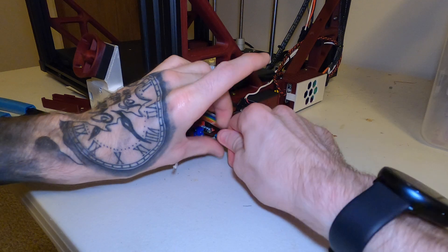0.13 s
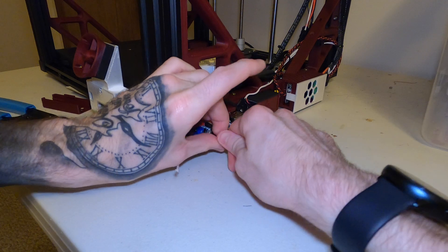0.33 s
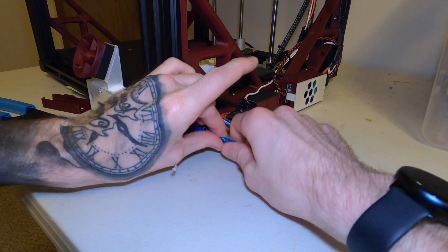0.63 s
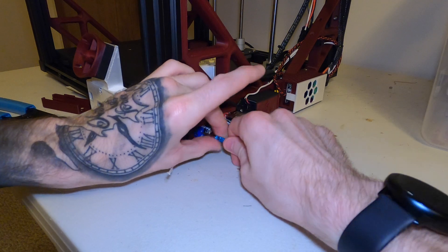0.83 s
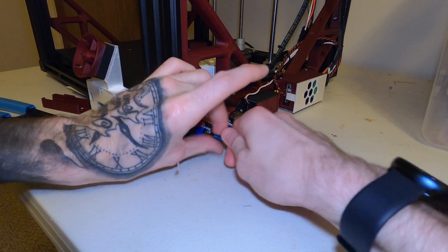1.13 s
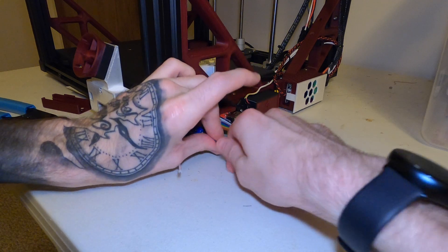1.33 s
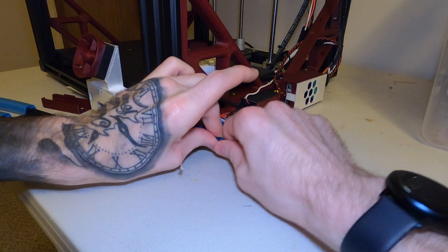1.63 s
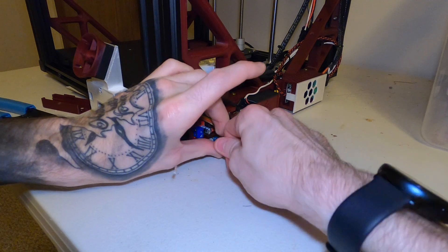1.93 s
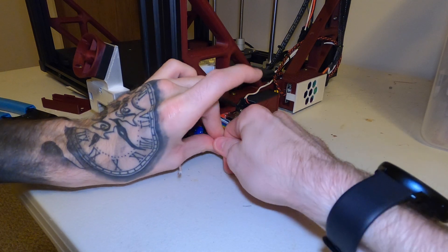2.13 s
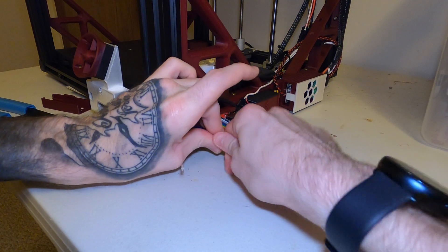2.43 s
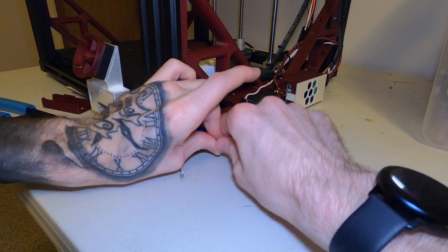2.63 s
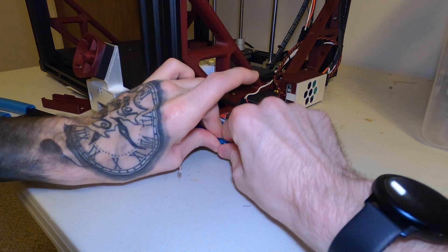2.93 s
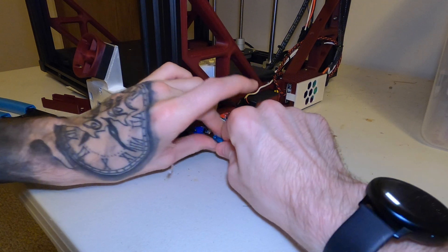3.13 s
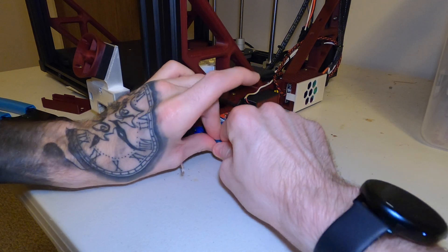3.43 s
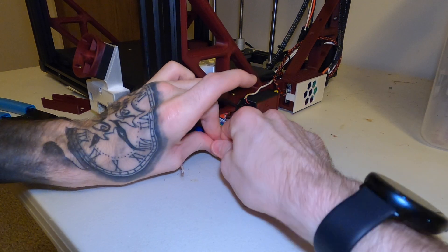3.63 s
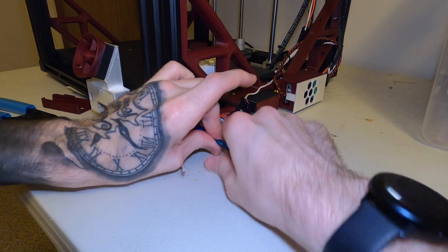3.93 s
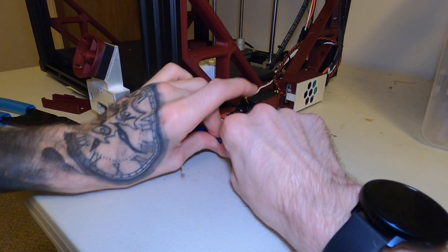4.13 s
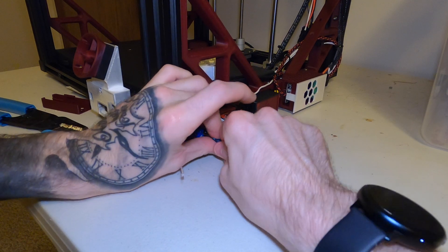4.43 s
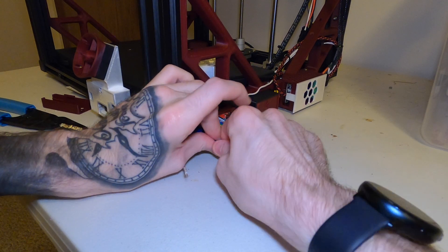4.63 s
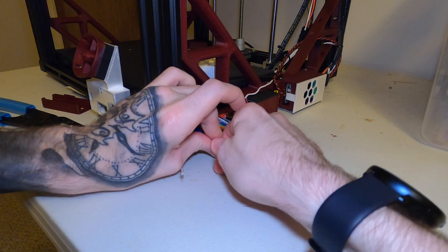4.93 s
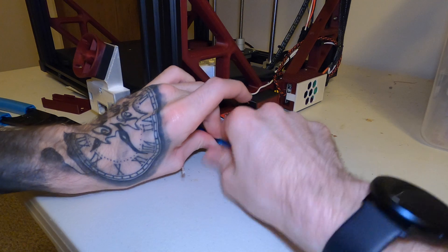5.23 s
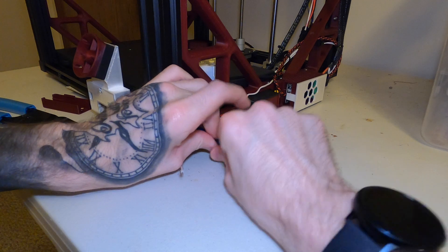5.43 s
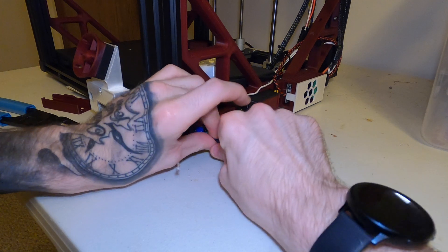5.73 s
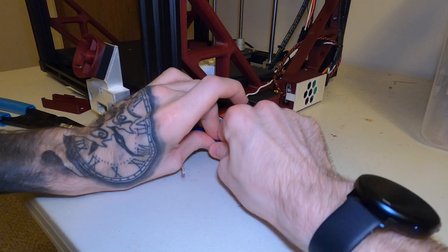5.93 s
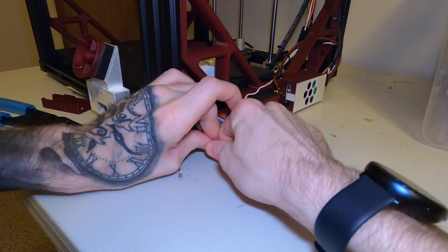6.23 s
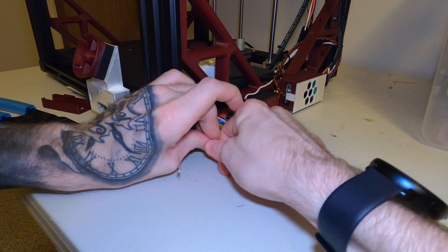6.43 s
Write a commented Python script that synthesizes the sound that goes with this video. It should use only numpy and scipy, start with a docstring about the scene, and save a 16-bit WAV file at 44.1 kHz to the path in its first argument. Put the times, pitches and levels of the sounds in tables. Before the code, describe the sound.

Plastic catches tick and twice snap loudly amid soft hand rubbing, thin wire scrapes and dull thuds against a frame on a bench.

```python
"""Wiring a small plastic module

Fingers work thin wires into a plastic module held against a machine frame on a bench.
Hands rub and bump the frame, which shudders dully. Wires scrape in tiny jerks and ping off
fingertips. Plastic catches tick as they let go and twice snap loudly, ringing the shell.
The bench rumbles under the wrists, and a small hard room echoes over a faint steady hiss."""
import sys
import numpy as np
from scipy import signal
from scipy.fft import rfft, irfft, next_fast_len
from scipy.io import wavfile

SR = 44100
rng = np.random.default_rng(int(sys.argv[2]) if len(sys.argv) > 2 else 0)


def put_to_file(sound):
    """Save the sound as 16-bit audio at rate SR, in the file named by the first command-line argument."""
    columns = np.atleast_2d(sound).T  # one column per channel
    safe = np.clip(columns, -1, 1)
    whole_steps = np.round(safe * 32767)
    wavfile.write(sys.argv[1], SR, whole_steps.astype(np.int16))


N = 289957

# Levels in the tables are relative: each source adds its own gain.
# plastic catches letting go: start_s, shell_db, crack_db, clack_db
CATCH_SNAPS = [(0.4997, -24.5, -44.5, -34), (0.5248, -13, -18.5, -21), (0.5534, -27.5, -37, -29),
               (0.853, -52, -75.5, -36.5), (1.172, -50.5, -61, -63), (1.943, -41, -46, -67),
               (2.8664, -11, -8, -38.5), (3.167, -46.5, -71, -58.5), (3.2227, -43.5, -56.5, -53),
               (3.797, -54.5, -67.5, -43), (4.286, -43, -54, -60), (5.281, -37.5, -46, -57),
               (5.292, -51, -63.5, -46), (5.507, -45.5, -54.5, -46), (5.637, -44.5, -48.5, -54.5)]
# fingers and module bumping the frame: start_s, clack_db, thud_db, tick_db
FRAME_BUMPS = [(0.1053, -29, -50.5, -45), (0.125, -17, -36.5, -30), (0.1442, -15, -29, -31.5),
               (0.374, -82, -43, -89), (0.5247, -32, -54, -12), (0.948, -33, -27, -43),
               (0.974, -24, -30.5, -37), (1.103, -42, -32, -54.5), (1.285, -32, -23, -33.5),
               (1.388, -64, -33.5, -80), (1.407, -44.5, -43, -50), (1.965, -44, -25, -65),
               (2.284, -38, -32.5, -45), (2.486, -62, -40, -59), (2.521, -47, -32, -53),
               (3.056, -71, -43.5, -79), (3.473, -63.5, -39.5, -68.5), (3.633, -49, -33, -57),
               (3.698, -61, -32, -56.5), (3.949, -38, -32, -50), (4, -35.5, -34.5, -41),
               (4.464, -71, -42, -71), (4.744, -40.5, -27, -58), (4.798, -49, -34, -56),
               (5.051, -72, -50.5, -75.5), (5.138, -40, -30, -63), (5.315, -58.5, -38.5, -70),
               (5.507, -46.5, -29, -52), (5.764, -59, -41.5, -72), (5.819, -57, -36, -75),
               (6.089, -47, -29, -57)]
# tone of a hollow clack: pitch_hz, level_db
CLACK_TONE = [(40, -53), (150, -15.5), (400, -4), (800, -1.5), (1150, 2), (1400, -3.5), (1900, 1.5),
              (2600, -12.5), (4000, -26.5), (6000, -41.5), (12000, -70)]


def snaps(low_hz=220):
    """A catch lets go with a crack that rings the shell; hard snaps also set steel rods ringing."""
    # tone of the sharp crack: pitch_hz, level_db
    crack_tone = [(40, -56.5), (200, -29), (550, -18), (900, -26.5), (1300, -18), (1700, 0.5), (3200, 4),
                  (3650, -2.5), (5200, 1), (6200, -12), (7800, -17), (10000, -29.5), (13000, -41.5),
                  (15000, -58)]
    # notes of the plastic shell: pitch_hz, width_hz, level_db
    shell_notes = [(1310, 200, -16.5), (1502, 71, -3.5), (1814, 83, 1), (2170, 200, -4), (2355, 100, 1.5),
                   (2860, 160, -5.5), (3080, 250, -14), (3880, 120, -13), (4626, 380, -18), (5170, 82, -14)]
    # notes of the thin steel rods: pitch_hz, width_hz, level_db
    rod_notes = [(983, 2.4, -10.5), (1665, 18, 4), (1586, 22, -2), (2470, 10, -4.5), (3230, 9, -3.5),
                 (4900, 5, -7.5)]
    out = np.zeros(N)
    crack, clack = as_hit(click(crack_tone)), as_hit(click(CLACK_TONE))
    rods = as_hit(ring(rod_notes, scatter_db=5.5, size=18000))
    for start_s, shell_db, crack_db, clack_db in CATCH_SNAPS:
        shell = amp(shell_db - 4.5) * as_hit(ring(shell_notes, scatter_db=1.7, size=2000))
        add(out, start_s, shell)
        scatter = amp(1.5) * rattle(fade_s=0.039)  # bench and hands scatter the sound
        add(out, start_s, room(shell, wet_db=3, direct=scatter))
        add(out, start_s, amp(2 * shell_db - 12.5) * rods)
        contact = amp(crack_db - 5) * dulled(crack, crack_db) + amp(clack_db - 11) * clack
        add(out, start_s, room(contact, wet_db=3.5, direct=rattle(fade_s=0.012)))
    return cut_bass(out, low_hz)  # so small a part gives off no bass


def dulled(crack, crack_db, top_hz=20000, db_per_octave=23.5):
    """A gentle release is slower, so its crack loses treble."""
    edge_hz = np.clip(top_hz * 2 ** (crack_db / db_per_octave), 1000, SR / 2.2)
    return signal.sosfilt(signal.butter(2, edge_hz, fs=SR, output="sos"), crack)


def bumps(damping_s=0.16):
    """Each bump thuds in the frame; harder contacts also clack and tick."""
    # tone of a bright tick: pitch_hz, level_db
    tick_tone = [(500, -40), (1800, -20.5), (2600, -13.5), (3400, 0.5), (3800, 4), (4150, 5.5),
                 (4700, -3.5), (5300, -8.5), (6300, -15), (8500, -28.5), (11000, -39.5), (14500, -53.5)]
    out = np.zeros(N)
    clack, tick = as_hit(click(CLACK_TONE)), as_hit(click(tick_tone))
    for start_s, clack_db, thud_db, tick_db in FRAME_BUMPS:
        thud = frame_ring(scatter_db=5, low_hz=160)
        thud *= fade(len(thud), damping_s)  # the hand damps the frame
        add(out, start_s, amp(thud_db - 5) * as_hit(thud))
        contact = amp(clack_db - 4.5) * clack + amp(tick_db - 2) * tick
        add(out, start_s, amp(-15) * contact)  # the first touch, then its rattle
        add(out, start_s, room(contact, wet_db=-7, direct=amp(-3) * rattle(fade_s=0.037)))
    return out


def frame_ring(scatter_db, low_hz):
    """The frame struck once; it gives off little deep bass."""
    # notes of the frame on the bench: pitch_hz, width_hz, level_db
    frame_notes = [(67, 12, -25), (133, 25, -14), (188.3, 19, 3), (216, 30, -3.5), (226, 28, 1.5),
                   (287.7, 24, 1), (360.2, 42, -4), (421.8, 69, -9.5), (585, 38, -16), (780, 53, -20.5)]
    return cut_bass(ring(frame_notes, scatter_db), low_hz)


def rubbing():
    """Skin drags on the frame and the module while the wires scrape past each other."""
    # tone of rubbing skin: pitch_hz, level_db
    rub_tone = [(40, -51), (150, -19), (400, 5.5), (650, 2), (800, 0), (1050, -7), (1600, -4), (2300, -16),
                (3000, -20.5), (6000, -44.5), (12000, -66.5)]
    # tone of scraping wires: pitch_hz, level_db
    scrape_tone = [(500, -37.5), (1800, -7), (2600, -4.5), (3150, 3), (3600, 7.5), (4100, -6), (5200, -3),
                   (6500, -17.5), (8500, -28), (11000, -33), (14500, -50)]
    # rasp of the ribbed wire: pitch_hz, width_hz, level_db
    rasp_notes = [(2980, 660, -5.5), (3490, 88, -3.5)]
    shudder, rub, scrape = stroke_strengths()
    frame = friction(slips(per_s=1100, spread_db=1), frame_ring(scatter_db=-2, low_hz=74.1))
    skin = friction(slips(per_s=1200, spread_db=0.5), click(rub_tone))
    grit = friction(slips(per_s=1900, spread_db=1), click(scrape_tone))
    rasp = friction(slips(per_s=900, spread_db=1.5), ring(rasp_notes, scatter_db=-0.5))
    bite = np.sqrt(scrape * shudder)  # the wire rasps only when it slides under pressure
    sliding = rub * skin + amp(-0.5) * scrape * grit + amp(-13.5) * bite * rasp
    return amp(-0.5) * shudder * frame + room(sliding, wet_db=-9.5)[:N]


def stroke_strengths():
    """How strongly the frame shudders, the skin rubs and the wires scrape over time."""
    # pushes and slides of the fingers: peak_s, rise_s, fall_s, shudder_db, rub_db, scrape_db
    strokes = [(0.079, 0.039, 0.036, -61, -53, -62), (0.116, 0.0071, 0.11, -58.5, -38.5, -43.5),
               (0.21, 0.059, 0.058, -43.5, -37.5, -58), (0.41, .05, .15, -52, -68.5, -73.5),
               (0.482, .04, .065, -44, -42, -44.5), (0.66, 0.37, 0.82, -58.5, -81, -89),
               (0.87, 0.094, 0.26, -45.5, -59.5, -72), (0.965, 0.063, 0.095, -37, -38.5, -54.5),
               (1.201, 0.35, 0.36, -55.5, -66, -69), (1.294, 0.015, 0.086, -33, -45.5, -51),
               (1.416, 0.034, 0.074, -43.5, -42, -48.5), (1.80, 0.059, 0.053, -44.5, -59, -64),
               (1.899, 0.11, 0.13, -39.5, -59.5, -68), (1.99, 0.11, 0.1, -35.5, -53, -61),
               (2.24, 0.19, .2, -57, -73, -83), (2.555, .05, 0.064, -46, -46, -49),
               (2.864, 0.016, 0.012, -59.5, -51.5, -34), (3.25, 0.13, 0.29, -58.5, -68.5, -76.5),
               (3.566, 0.095, 0.083, -41, -51, -61.5), (3.689, 0.13, 0.17, -40, -53.5, -63),
               (3.885, 0.027, 0.16, -49, -58.5, -85), (3.985, 0.066, 0.059, -46, -42.5, -48.5),
               (4.288, 0.028, 0.038, -73, -73, -60.5), (4.42, 0.06, .35, -56.5, -78, -79),
               (4.64, .11, 0.15, -44, -57, -74), (4.78, 0.094, 0.13, -34.5, -51, -66.5),
               (5.225, 0.088, 0.057, -40.5, -43.5, -53.5), (5.259, 0.016, 0.071, -51.5, -47, -55),
               (5.515, 0.037, 0.031, -39, -45, -69), (5.92, 0.084, 0.15, -37.5, -53, -82),
               (6.108, 0.096, 0.13, -36, -54, -61), (6.38, 0.37, 0.15, -45.5, -69, -78)]
    t = np.linspace(0, N / SR, 6000)
    power = np.zeros((3, len(t)))
    for peak_s, rise_s, fall_s, *levels_db in strokes:
        power += amp(np.array(levels_db)[:, None] + swell(t, peak_s, rise_s, fall_s)) ** 2
    drag, rub, scrape = np.sqrt(power)
    shudder = shaking(t, drag)
    rub = np.hypot(rub, amp(-25.5) * shudder)  # any drag rustles a little
    scrape = np.hypot(scrape, amp(-33.5) * shudder)
    return [np.interp(np.arange(N) / SR, t, level) for level in (shudder, rub, scrape)]


def shaking(t, drag, settle_db_per_s=157.5):
    """The frame's shudder follows strokes and hits at once, but settles at its own pace."""
    hits = [(start_s, thud_db - 9) for start_s, _, thud_db, _ in FRAME_BUMPS]
    hits += [(start_s, shell_db - 39) for start_s, shell_db, _, _ in CATCH_SNAPS]
    level_db = 20 * np.log10(drag + 1e-12)
    for start_s, hit_db in hits:
        at = np.searchsorted(t, start_s)
        level_db[at] = max(level_db[at], hit_db)
    settled_db = settle_db_per_s * t
    return amp(np.maximum.accumulate(level_db + settled_db) - settled_db)


def wire_flicks():
    """A wire slips off a finger and pings briefly."""
    # each flick off a fingertip: start_s, level_db
    flicks = [(3.223, -55.5), (5.5059, -38.5), (5.638, -46)]
    # notes of the wire's ping: pitch_hz, width_hz, level_db
    ping_notes = [(2880, 350, 0.5), (3470, 250, -4)]
    out = np.zeros(N)
    ping = as_hit(ring(ping_notes, scatter_db=3, size=1000))
    for start_s, level_db in flicks:
        add(out, start_s, amp(level_db - 4.5) * room(ping, wet_db=-0.5, direct=rattle(fade_s=0.023)))
    return out


def bench_rumble(rise_s=0.093, fall_s=0.12):
    """The bench top rumbles as weight shifts on it."""
    # wrists leaning on the bench: peak_s, level_db
    leans = [(1.985, -45.5), (3.70, -50), (4.02, -53), (4.791, -50), (6.11, -57), (6.381, -53)]
    # tone of the bench top: pitch_hz, level_db
    bench_tone = [(30, -35), (60, -16), (90, -3), (130, -4), (172, 9), (215, -10), (400, -33), (1500, -75)]
    t = np.arange(N) / SR
    weight = sum(amp(level_db + swell(t, peak_s, rise_s, fall_s)) for peak_s, level_db in leans)
    return weight * friction(slips(per_s=1100, spread_db=1.5), click(bench_tone, size=8192))


def room(sound, wet_db, direct=(1,), build_s=0.003):
    """A sound arrives directly and as a wash of room echoes, whose level is wet_db."""
    # time the echoes take to fall by 60 dB: pitch_hz, fade_s
    fade_times = [(150, 0.63), (600, 0.32), (1800, 0.36), (5000, 0.39), (8000, .37), (13000, 0.24)]
    # tone of the echoes: pitch_hz, level_db
    echo_tone = [(150, 0.5), (550, 1), (1200, 2), (2500, -4.5), (5000, -3.5), (9000, 3.5)]
    hz, t, spectrum = signal.stft(rng.standard_normal(20000), SR, nperseg=256)
    level_db = look_up(echo_tone, hz)[:, None] - 60 * t / look_up(fade_times, hz)[:, None]
    tail = signal.istft(spectrum * amp(level_db), SR, nperseg=256)[1]
    tail *= 1 - np.exp(-np.arange(len(tail)) / SR / build_s)  # echoes thicken as they arrive
    path = amp(wet_db) * tail / np.linalg.norm(tail)
    add(path, 0, np.asarray(direct))
    return signal.fftconvolve(sound, path)


def room_hiss():
    """The steady hiss and rumble of the quiet room."""
    # tone of the background: pitch_hz, level_db
    hiss_tone = [(20, -20), (40, -9), (62, 1.5), (100, -3), (170, 2), (280, -2), (600, -9.5), (900, -17),
                 (1200, -7), (2500, -11.5), (5500, -17), (7000, -22.5), (11000, -31.5), (14500, -39.5)]
    hiss = signal.fftconvolve(rng.standard_normal(N), click(hiss_tone, size=8192))[:N]
    return amp(-66) * unit(hiss)


def slips(per_s, spread_db):
    """Surfaces stick and slip: tiny jerks at random times and of uneven size."""
    happens = rng.random(N) < per_s / SR
    strength = amp(spread_db * np.clip(rng.standard_normal(N), -2, 2))
    return happens * strength * rng.choice([-1, 1], N)


def friction(jerks, response):
    """Every jerk sets off the same short sound; together they blur into a rustle or rumble."""
    return unit(signal.fftconvolve(jerks, response)[:N])


def swell(t, peak_s, rise_s, fall_s, depth_db=20.5, roundness=1.47):
    """Level in dB of one push: pressure builds to the peak, then eases."""
    away = np.maximum((peak_s - t) / rise_s, (t - peak_s) / fall_s)
    return -depth_db * np.minimum(away, 10) ** roundness


def ring(notes, scatter_db, size=6000):
    """An object's notes struck once, each at a slightly random strength; wider notes die sooner."""
    t = np.arange(size) / SR
    pitch_hz, width_hz, level_db = np.transpose(notes)[:, :, None]
    strength = width_hz * amp(level_db + scatter_db * rng.standard_normal(level_db.shape))
    sign = (-1) ** np.arange(len(notes))[:, None]
    decay = np.exp(-np.pi * width_hz * t)
    return np.sum(sign * strength * decay * np.sin(2 * np.pi * pitch_hz * t), axis=0)


def click(tone, size=2048):
    """A short click with the given level at each pitch."""
    gains = amp(look_up(tone, np.fft.rfftfreq(size, 1 / SR)))
    cepstrum = irfft(np.log(gains))
    cepstrum[1:size // 2] *= 2  # folding this in half packs the energy at the click's start
    cepstrum[size // 2 + 1:] = 0
    return irfft(np.exp(rfft(cepstrum)))


def rattle(fade_s, size=2500):
    """The quick uneven rattle of a contact and the surfaces beside it, with energy 1."""
    burst = rng.standard_normal(size) * fade(size, fade_s)
    return burst / np.linalg.norm(burst)


def fade(size, fade_s):
    """A gain that falls by 60 dB every fade_s."""
    return amp(-60 * np.arange(size) / SR / fade_s)


def cut_bass(sound, low_hz):
    """Weaken everything below low_hz."""
    return signal.sosfilt(signal.butter(2, low_hz, "high", fs=SR, output="sos"), sound)


def as_hit(sound, size=176):
    """Scale a sound to the energy of four milliseconds at level 1."""
    return sound * np.sqrt(size / np.sum(sound ** 2))


def unit(sound):
    """Scale a sound to an average (rms) level of 1."""
    return sound / np.sqrt(np.mean(sound ** 2) + 1e-20)


def amp(db):
    """Turn decibels into gain."""
    return 10 ** (np.asarray(db) / 20)


def look_up(table, hz):
    """Read between a table's rows, with pitch spaced by octaves."""
    pitches_hz, values = np.transpose(table)
    return np.interp(np.log(hz + 1), np.log(pitches_hz + 1), values)


def add(track, start_s, sound):
    """Mix a sound into the track at start_s."""
    part = track[max(round(start_s * SR), 0):][:len(sound)]
    part += sound[:len(part)]


def scene():
    """Everything as heard from above the bench, in one channel."""
    return (rubbing() + bench_rumble() + bumps() + snaps() + wire_flicks() + room_hiss())[None]


def record(dry, top_hz=14500):
    """Remove the highest treble, above top_hz."""
    size = next_fast_len(N + SR // 2)
    passes = np.fft.rfftfreq(size, 1 / SR) < top_hz
    return irfft(rfft(dry, size) * passes, size)[:, :N]


dry = scene()
out = record(dry)
put_to_file(out)
```